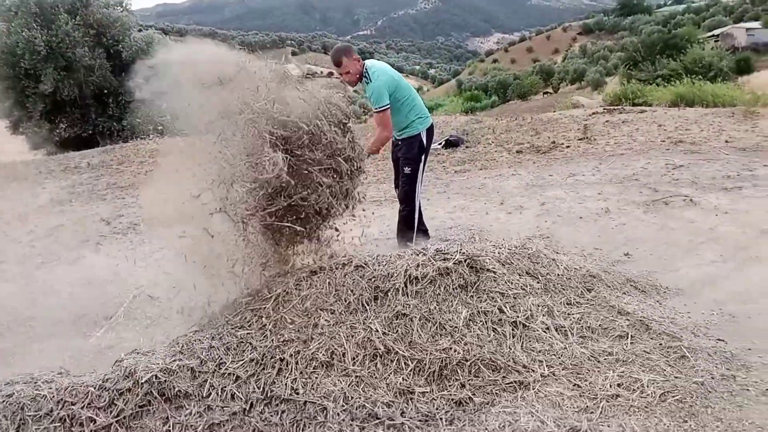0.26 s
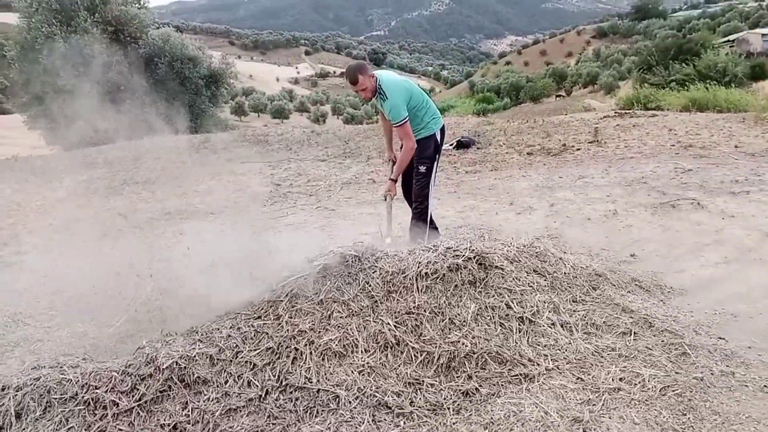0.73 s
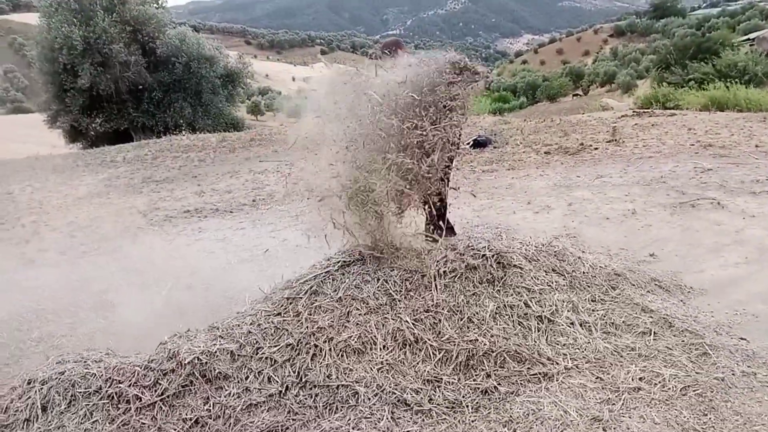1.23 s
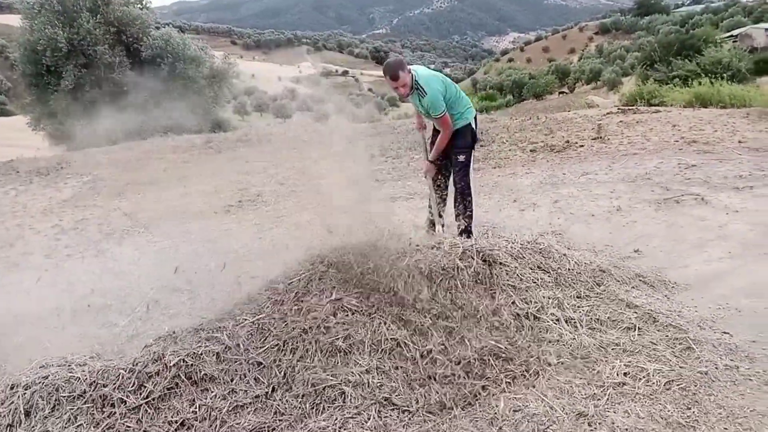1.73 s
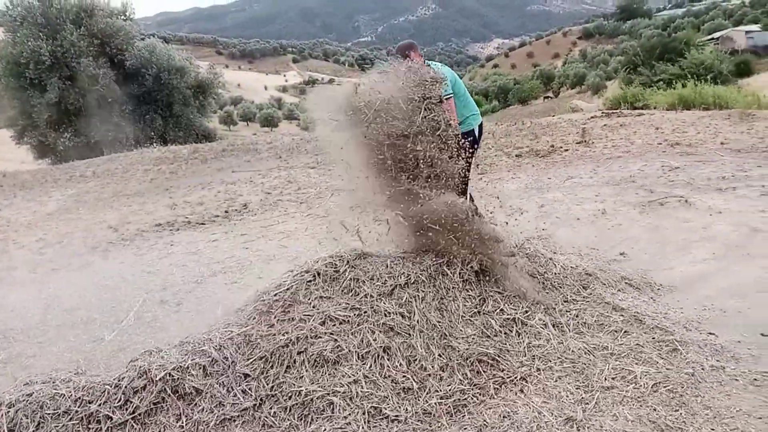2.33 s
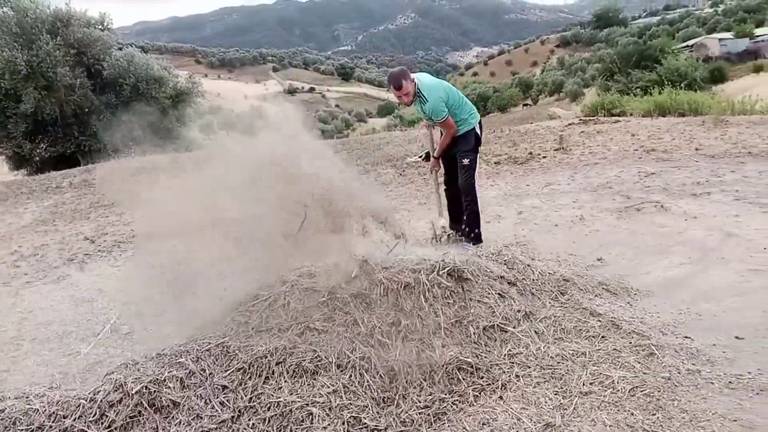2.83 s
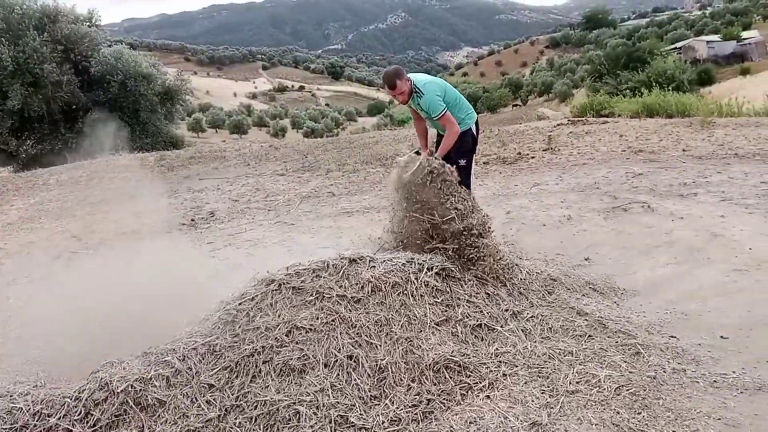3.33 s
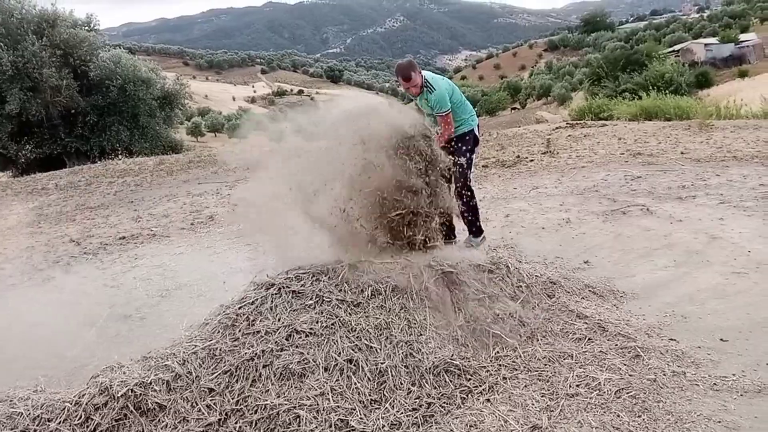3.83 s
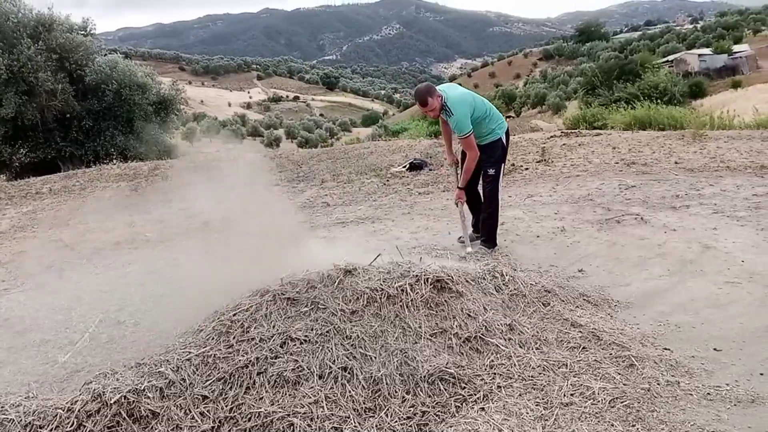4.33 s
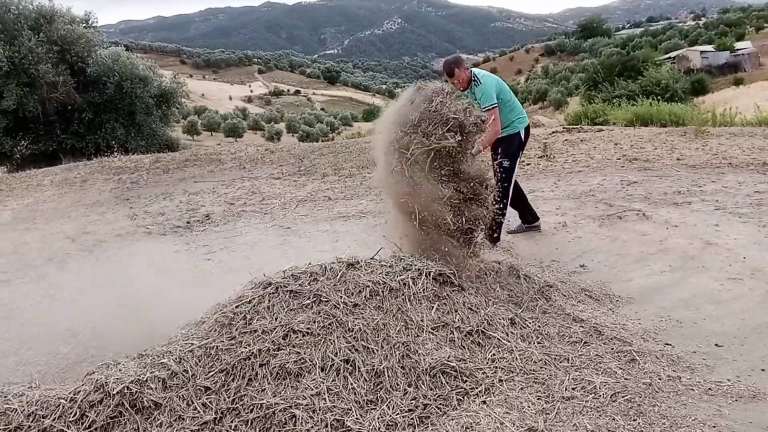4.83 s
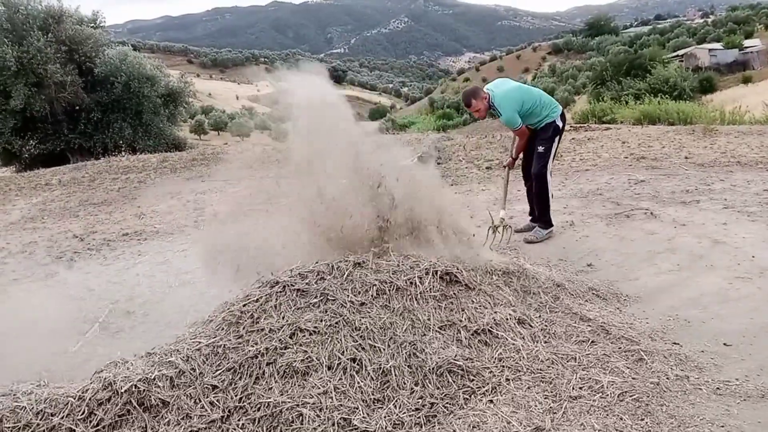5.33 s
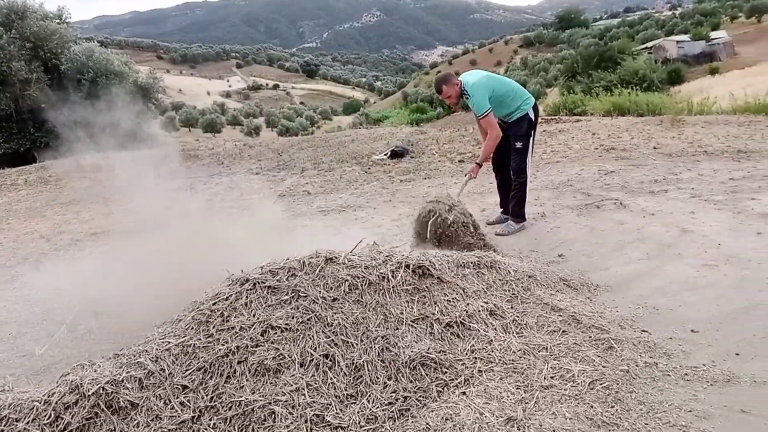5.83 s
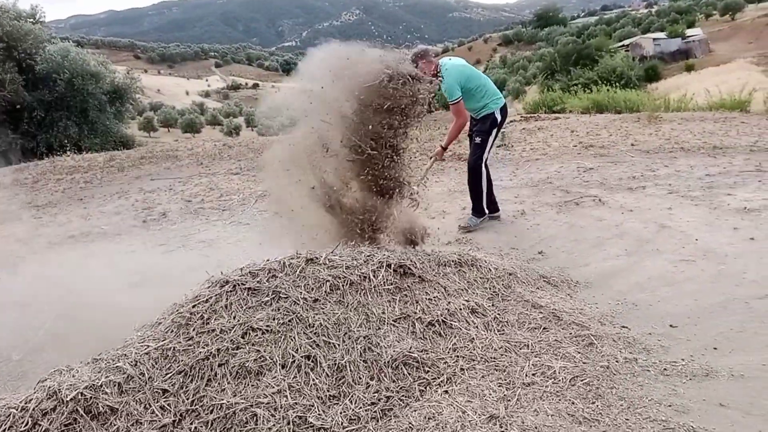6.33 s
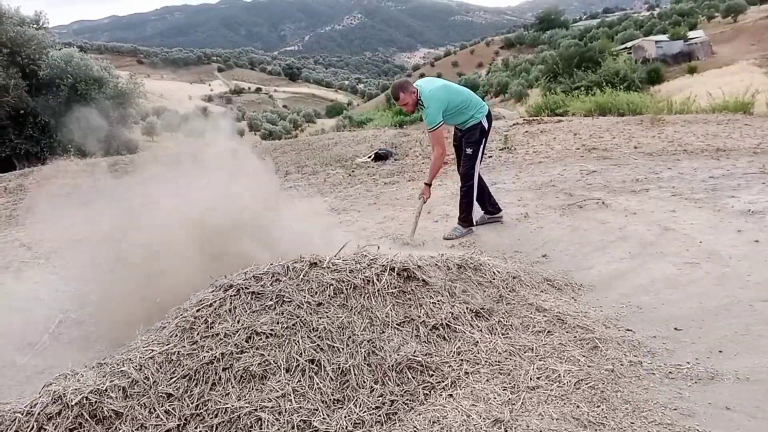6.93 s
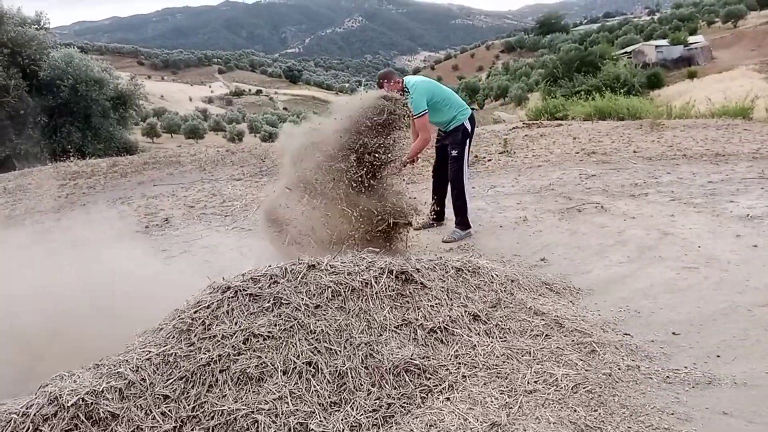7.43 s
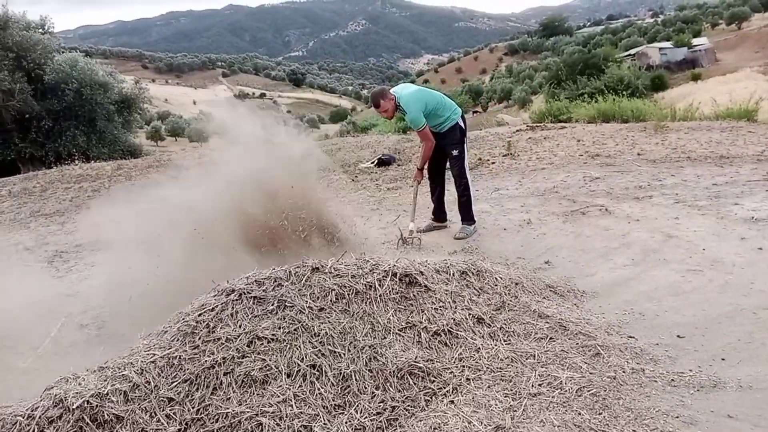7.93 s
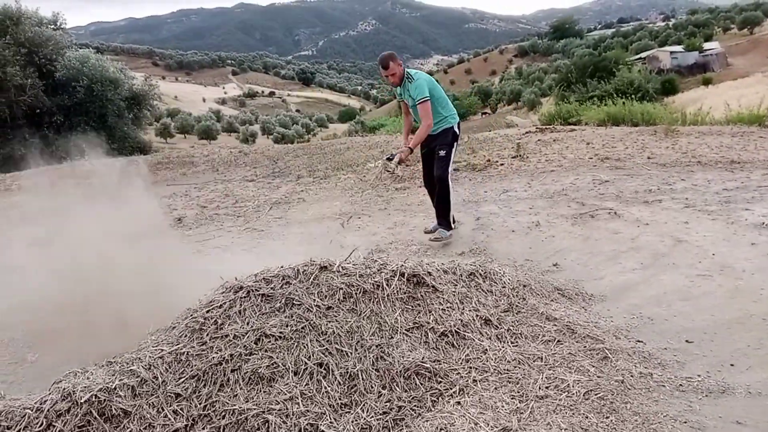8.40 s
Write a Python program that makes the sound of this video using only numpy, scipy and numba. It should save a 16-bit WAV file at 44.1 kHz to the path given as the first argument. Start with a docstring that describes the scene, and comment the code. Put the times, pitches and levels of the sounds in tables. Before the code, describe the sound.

Dry straw rustles in repeated surges as a pitchfork scrapes and clinks on stones, with wind rumbling on the microphone.

```python
"""Dry straw rustles in surges as a fork is thrust in and the straw is tossed, on an open hillside.
Each surge is thousands of tiny clicks of chaff and stalk, with the odd sharp snap. During and between
the rustles, the steel tines scrape through straw and over the ground and ring on stones. Gusts rumble
on the microphone port; further off, sparrows chirp, a bird whistles and faint hoots sound over a
quiet hiss."""
import sys
import numpy as np
from scipy import signal
from scipy.fft import rfft, irfft
from scipy.io import wavfile
from scipy.ndimage import uniform_filter1d
from numba import njit

SR = 44100
rng = np.random.default_rng(int(sys.argv[2]) if len(sys.argv) > 2 else 0)


def pcm_store(signal):
    """Save signal as 16-bit PCM."""
    levels = np.round(np.clip(np.atleast_2d(signal), -1, 1) * 32767)
    wavfile.write(sys.argv[1], SR, levels.astype(np.int16).T)


N = 381906
T = np.arange(N) / SR

# tone of fine chaff and of coarse stalks: (frequency [Hz], relative level [dB])
CHAFF_EQ = [(3500, -26), (4600, -19.5), (5900, -17), (7300, -9), (9400, 4.5), (11500, -6), (13500, -14.5),
            (15500, -1.5)]
STALK_EQ = [(450, -27), (900, -24.5), (1300, -22), (2200, -7.5), (3000, -6.5), (4100, 3.5), (5000, -2.5),
            (6200, -5), (7500, 2.5), (9000, -30.5)]
# surges of rustle: (time [s], hold [s], level [dB], rise [dB/s], fall [dB/s], stalks against chaff [dB])
RUSTLES = [(0.21, 0.0078, -60.5, 36, 74, -11), (0.53, 0.13, -52.5, 71, 150, -7),
           (1.622, 0.24, -41, 141, 111, -5), (2.7, .18, -47, 44.5, 87, -6),
           (3.78, 0.063, -47, 72.5, 96, -7), (4.11, 0.0067, -52.5, 55, 127, -7.5),
           (5.39, 0.15, -56.5, 24, 97, -9.5), (6.49, 0.011, -63, 41, 46, -10.5),
           (6.812, 0.077, -43, 115, 182, -8.5), (7.73, 0.017, -60, 62, 200, -7),
           (7.91, 0.027, -63, 71, 38, -2), (8.06, 0.026, -57, 204, 80, -7)]
# chaff adrift on the wind between surges: (time [s], level [dB])
CHAFF_DRIFT = [(0.0, -61), (0.4, -60.5), (0.75, -62.5), (0.96, -61.5), (1.1, -67.5), (1.45, -60.5),
               (2.1, -69), (2.4, -64), (3.2, -65.5), (4.38, -58.5), (4.46, -69.5), (4.6, -65.5), (5.6, -61),
               (5.8, -77.5), (6.0, -66), (6.3, -76), (7.05, -64), (7.24, -68), (7.6, -73.5), (8.2, -82),
               (8.45, -86), (8.66, -78)]


def straw(drift_stalks_db=-11.5, clump_db=1.5, clumps_per_s=14):
    """Straw rustles as it is forked and tossed: fine chaff hisses high, hollow stalks ring lower."""
    drift = curve(CHAFF_DRIFT) ** 2
    surges = [(swell(*shape), undb(stalks_db) ** 2) for *shape, stalks_db in RUSTLES]
    chaff_power = drift + sum(power for power, _ in surges)
    stalk_power = drift * undb(drift_stalks_db) ** 2 + sum(power * share for power, share in surges)
    chaff = rattle(CHAFF_EQ, tumble_s=.008, cycles=1.18, spread_db=2.5, hit_db=2.0, pieces=30000)
    chaff *= np.sqrt(chaff_power) * undb(0.92 * walk(30))
    stalks = rattle(STALK_EQ, tumble_s=.02, cycles=3.8, spread_db=1.5, hit_db=1.0, pieces=20000)
    stalks *= np.sqrt(stalk_power) * undb(0.8 * walk(30))
    return undb(clump_db * walk(clumps_per_s)) * (chaff + stalks)


def rattle(eq, tumble_s, cycles, spread_db, hit_db, pieces, knocks=5):
    """Each piece has its own pitch and size and knocks several times as the straw shifts."""
    low, high = eq[0][0], eq[-1][0]
    register, bulk, arrival = rng.random((pieces, 3)).T
    offset, force, polarity = rng.random((pieces, knocks, 3)).T
    pitch = low * (high / low) ** register
    # high rings are short and sparse per hertz: pitch squared makes up for it
    size = pitch ** 2 * undb(-spread_db * np.log(bulk + .002))
    at = (arrival * N + tumble_s * SR * (offset - .5)).clip(0).astype(np.int64)
    hits = size * undb(-hit_db * np.log(force + .002)) * np.sign(polarity - .5)
    return colour(grains(at.ravel(), np.tile(pitch, knocks), cycles, hits.ravel()), eq)


@njit
def grains(at, hz, cycles, size):
    """Every knock is one tiny ring that swells and dies, starting at its own sample."""
    out = np.zeros(N)
    for k in range(len(at)):
        pole = np.exp((2j * np.pi - 1 / cycles) * hz[k] / SR)
        decay, ring = size[k] + 0j, 0j
        for i in range(at[k], min(at[k] + int(6 * cycles / hz[k] * SR), N)):
            decay *= pole
            ring = ring * pole + decay
            out[i] += ring.imag
    return out


# single stalks breaking: (time [s], level [dB], pitch [Hz])
STALK_SNAPS = [(0.137, -42, 9420), (0.3127, -43, 9650), (0.415, -40, 9500), (0.4908, -35, 11000),
               (0.608, -29, 10400), (0.7275, -24.5, 8730), (1.233, -46, 10700), (1.3997, -46, 8950),
               (1.4941, -33.5, 7100), (1.505, -32, 6800), (1.5266, -37, 9000), (1.5569, -49, 8500),
               (1.5985, -19.5, 7500), (1.638, -21, 9000), (1.6538, -22, 9400), (1.731, -23.5, 8500),
               (1.7614, -20.5, 9000), (1.947, -29, 7080), (1.9893, -37, 8890), (2.3825, -42.5, 6900),
               (2.5585, -27.5, 8100), (2.6224, -46, 9510), (2.7616, -40, 10700), (2.805, -31, 9260),
               (2.8557, -29, 9400), (2.9269, -23, 8900), (3.3334, -46, 9150), (3.7521, -35.5, 7140),
               (3.901, -32, 9360), (3.946, -35, 7070), (4.055, -42, 10000), (4.1046, -36, 9700),
               (4.2316, -51, 9280), (5.1032, -40, 8900), (5.1821, -40.5, 8600), (5.2536, -43, 8950),
               (5.535, -37, 9880), (5.5916, -44, 9800), (5.654, -39, 9300), (6.4746, -45, 8240),
               (6.6787, -43, 9850), (6.7207, -36, 9550), (6.796, -44, 9300), (6.8516, -24, 9410),
               (6.8993, -29, 7250), (6.95, -32.5, 9600), (7.5546, -44.5, 9600), (8.0574, -31.5, 9300)]


def snaps():
    """A stalk snaps with a bright tick and a softer ring about an octave below."""
    out = np.zeros(N)
    for when, db, hz in STALK_SNAPS:
        add_ring(out, when, db - 0.5, hz, cycles=2.2)
        add_ring(out, when, db - 13, 0.509 * hz, cycles=1.16)
    return out


# resonances of the steel tines: (frequency [Hz], nominal width [Hz], relative level [dB])
TINE_MODES = [(1276.6, 23, -13.5), (1425, 51, -13), (1746, 42, -4.5), (2202, 76, -1.5), (2552, 51, -5),
              (2834, 27, -14.5), (3112, 77, 3), (3677, 83, 6.5), (4170, 30, -3), (4684, 80, -4.5),
              (5280, 49, -13), (6030, 49, -12.5), (6920, 48, -10.5), (7310, 49, -13), (7400, 66, -12.5),
              (7670, 51, -11), (9640, 350, -1)]
# drags through straw and over the ground: (time [s], hold [s], level [dB])
FORK_DRAGS = [(0.145, 0.075, -64), (0.3, 0.15, -71.5), (0.51, 0.184, -55), (0.712, 0.047, -45),
              (0.79, 0.024, -53.5), (0.825, 0.028, -47.5), (0.877, 0.046, -46), (1.66, .17, -55.5),
              (1.839, .16, -51), (2.56, .22, -65), (2.8, .17, -54.5), (3.027, 0.089, -53.5),
              (3.15, 0.068, -69), (3.66, .26, -60), (4.03, 0.15, -62), (4.3, 0.035, -57.5),
              (4.345, 0.079, -54), (5.38, 0.091, -66.5), (5.49, 0.094, -61.5), (5.601, 0.11, -53.5),
              (5.74, 0.04, -64.5), (5.83, 0.13, -71.5), (6.677, 0.012, -54.5), (6.73, 0.14, -59),
              (6.86, 0.091, -49), (7.01, 0.026, -59.5), (8.06, 0.059, -57.5), (8.14, 0.042, -48)]


def fork_scrape(bite_db_s=902, lift_db_s=496, grit_per_s=4000):
    """Grit slips under the tines and rings them, each mode caught and let go on its own."""
    gain = np.sqrt(sum(swell(*row, bite_db_s, lift_db_s) for row in FORK_DRAGS))
    slips = rng.random(N) < grit_per_s / SR
    grit = slips * undb(1.1 * rng.exponential(size=N)) * rng.standard_normal(N)
    grit *= undb(2.85 * walk(45))
    drag = np.zeros(N)
    for hz, width, db in TINE_MODES:
        mode = bandpass(bandpass(grit, hz, 2.05 * width), hz, 2.35 * width)
        drag += undb(db + 5.1 * walk(30)) * unit(mode)
    return gain * unit(drag)


# tines catching on stones: (time [s], strength [dB], favoured pitch [Hz])
STONE_HITS = [(0.5166, -38, 3960), (0.706, -41, 3930), (0.7218, -36, 3040), (0.7544, -42, 3750),
              (0.7947, -52, 3640), (0.8273, -42, 3660), (0.8789, -30, 3640), (0.9098, -35.5, 3750),
              (1.8994, -39, 3760), (1.9494, -36, 3750), (2.0368, -48, 3000), (2.7798, -38, 4220),
              (2.958, -47, 3570), (3.025, -35, 3750), (3.0544, -62, 3770), (3.119, -40, 3680),
              (3.1894, -47, 1760), (3.2257, -54, 3220), (4.2954, -39, 4200), (4.342, -38, 3070),
              (4.3644, -45, 3750), (4.3994, -58, 3120), (5.103, -36.5, 4750), (5.55, -41.5, 2540),
              (5.6528, -34, 3670), (5.6944, -44, 3650), (5.744, -42, 3560), (5.7823, -51, 2870),
              (6.8983, -33, 2800), (6.9213, -39, 3700), (6.977, -37.5, 3690), (7.02, -48, 4160),
              (7.5465, -47, 1800), (8.0795, -36, 3660), (8.1599, -36, 4000), (8.1778, -37, 1750)]


def stone_catches(rolloff_db_octave=52, grind_s=.005):
    """A stone gives the tines a brief grinding jolt that rings the modes near one pitch most."""
    out = np.zeros(N)
    hz, width, mode_db = np.transpose(TINE_MODES)
    t = np.arange(int(.06 * SR)) / SR
    modes = np.exp(-np.pi * .6 * np.outer(width, t)) * np.sin(2 * np.pi * np.outer(hz, t))
    for when, db, favoured_hz in STONE_HITS:
        off_pitch_db = rolloff_db_octave * np.abs(np.log2(hz / favoured_hz))
        shares = undb(db - 2.5 + 0.4 * mode_db - off_pitch_db + 2.0 * rng.standard_normal(len(hz)))
        grind = np.exp(-t[:600] / grind_s) * rng.standard_normal(600)
        clink = signal.fftconvolve(shares @ modes, grind / np.linalg.norm(grind))
        at = int(when * SR)
        out[at:at + len(t)] += clink[:len(t)] / 3
    return out


# tone of the rumble: (frequency [Hz], relative level [dB])
WIND_EQ = [(25, -34.5), (45, -4.5), (70, 5.5), (110, 6), (160, -3.5), (230, -12.5), (330, -42)]
# breeze under the gusts: (time [s], level [dB])
BREEZE_BED = [(0.0, -74.5), (0.55, -80.5), (0.9, -74), (1.6, -69), (1.95, -70.5), (2.4, -73.5), (2.75, -81),
              (3.8, -85), (4.0, -64), (4.2, -61), (4.3, -82), (4.6, -78), (5.4, -85), (5.9, -80),
              (6.4, -83.5), (7.4, -80), (7.9, -69), (8.66, -70)]
# gusts on the port: (time [s], hold [s], level [dB])
WIND_GUSTS = [(0.0, 0.0033, -47), (0.29, 0.0068, -73), (0.38, 0.011, -64), (0.86, 0.031, -57.5),
              (1.03, 0.0063, -63.5), (1.35, 0.071, -59.5), (1.76, 0.047, -53), (2.35, .01, -60),
              (2.511, 0.031, -55.5), (3.09, 0.091, -50), (3.399, 0.062, -51), (3.79, .005, -75),
              (3.926, 0.0068, -47.5), (4.05, 0.14, -51), (4.385, 0.012, -52), (5.69, 0.048, -52),
              (5.859, 0.01, -60), (6.12, 0.0076, -53), (6.2, 0.0059, -54), (6.269, 0.0038, -52),
              (6.85, 0.0092, -69), (7.48, 0.082, -62.5), (7.72, .005, -60.5), (7.78, 0.055, -57.5),
              (7.91, 0.037, -54), (8.02, 0.042, -48.5), (8.21, 0.061, -51.5), (8.32, 0.043, -46.5),
              (8.42, 0.058, -54)]
# single thumps of air: (time [s], level [dB], pitch [Hz])
AIR_THUMPS = [(3.908, -40.5, 122), (3.928, -40.5, 178), (4.086, -51, 617), (4.123, -32.5, 261),
              (4.126, -31, 114), (6.192, -40.5, 129)]


def wind(rise_db_s=412, fall_db_s=406):
    """Eddies break over the microphone port as low, lumpy rumble, now and then as one thump."""
    gusts = sum(swell(*row, rise_db_s, fall_db_s) for row in WIND_GUSTS)
    eddies = rng.standard_normal(N) * undb(6.2 * walk(30))
    out = np.sqrt(curve(BREEZE_BED) ** 2 + gusts) * colour(eddies, WIND_EQ)
    for when, db, hz in AIR_THUMPS:
        add_ring(out, when - .5 / hz, db, hz, cycles=.5 + hz / 500)
    return out


# sparrow chirps and a lower whistle, one list per call: (time [s], pitch [Hz], level [dB])
SPARROW_CALLS = [
    [(4.565, 4400, -66), (4.582, 4050, -61), (4.598, 4500, -62), (4.606, 4000, -62), (4.616, 3150, -72.5),
     (4.634, 4400, -71), (4.642, 3350, -73), (4.66, 3300, -78)],
    [(4.825, 4500, -67), (4.84, 5100, -64), (4.846, 3700, -61), (4.858, 3650, -49.5), (4.868, 4100, -70),
     (4.876, 3100, -67), (4.905, 3150, -79)],
    [(6.29, 4500, -78), (6.302, 4450, -67), (6.354, 3050, -67), (6.376, 4560, -90), (6.426, 3261, -67.5),
     (6.47, 3300, -79)],
    [(7.46, 4405, -86), (7.484, 4000, -65), (7.514, 4040, -78), (7.542, 3130, -70), (7.57, 3200, -79)],
    [(7.592, 4400, -38), (7.608, 4050, -61), (7.624, 4550, -60), (7.636, 3850, -69), (7.654, 3800, -58),
     (7.666, 4500, -60), (7.677, 3250, -60), (7.7, 3500, -71), (7.72, 4400, -74), (7.78, 4420, -64)],
    [(8.38, 4300, -82), (8.386, 4070, -73.5), (8.436, 3356, -81), (8.45, 2945, -93)],
]
WHISTLE_CALLS = [
    [(8.23, 2160, -84), (8.25, 2224, -77), (8.288, 2125, -64.5), (8.33, 1916, -70), (8.398, 1860, -82),
     (8.41, 1810, -91)],
    [(8.54, 1830, -99), (8.592, 1845, -80), (8.626, 1810, -82), (8.652, 1970, -89), (8.66, 1904, -87)],
]


def bird(calls, warble, warble_hz, flutter_db):
    """A gliding near sine, shaken by a fast warble and fluttering on its way through moving air."""
    out = np.zeros(N)
    for rows in calls:
        span, gain, (hz,) = contour(rows)
        shake = warble * (np.sin(2 * np.pi * warble_hz * T[span]) + .5 * walk(300, len(hz)))
        flutter = undb(flutter_db * (walk(101, len(hz)).clip(max=1) - 0.5))
        phase = 2 * np.pi * np.cumsum(hz * (1 + shake)) / SR
        out[span] += gain * flutter * np.sqrt(2) * np.sin(phase)
    return out


# faint low hoots: (start [s], end [s], pitch [Hz], level [dB])
HOOT_NOTES = [(3.099, 3.426, 620, -67), (3.146, 3.219, 1014, -74), (3.337, 3.47, 1000, -78.5),
              (3.705, 3.772, 947, -75.5), (5.598, 5.732, 628, -74), (7.444, 7.519, 784, -71.5),
              (7.585, 7.632, 737, -77), (7.741, 7.891, 971, -81)]


def hoots(breath_width_hz=54.0):
    """Soft, breathy tones that waver in pitch and level."""
    out = np.zeros(N)
    for start, end, hz, db in HOOT_NOTES:
        span, gain, _ = contour([(start, db), (end, db)])
        size = len(gain)
        breath = bandpass(rng.standard_normal(size), hz, breath_width_hz)
        breath = unit(bandpass(breath, hz, breath_width_hz))
        phase = 2 * np.pi * np.cumsum(hz * (1 + 0.0146 * walk(40.1, size))) / SR
        out[span] += gain * undb(2.9 * walk(37.7, size)) * (np.sin(phase) + 0.65 * breath)
    return out


def hillside(x, t60_s, wet_db):
    """Trees and slopes scatter a distant call into a short smear."""
    t = np.arange(int(.3 * SR)) / SR
    tail = rng.standard_normal(len(t)) * undb(-60 * t / t60_s)
    return x + undb(wet_db) * signal.oaconvolve(x, tail / np.linalg.norm(tail))[:N]


# tone of the background hiss: (frequency [Hz], relative level [dB])
AIR_EQ = [(120, -5.5), (200, -6), (300, -6.5), (500, -8.5), (1000, -12.5), (2300, -15), (3600, -13),
          (6000, -45), (9600, -23.5), (13400, -31.5), (15800, -22)]


def open_air(level_db=-78.5):
    """The quiet hiss of the hillside, gently wavering."""
    return undb(level_db + 1.1 * walk(6.3)) * colour(rng.standard_normal(N), AIR_EQ)


def undb(db):
    return 10 ** (np.asarray(db) / 20)


def unit(x):
    return x / np.sqrt(np.mean(x ** 2))


def curve(rows):
    """Gain for every sample from (time [s], level [dB]) rows."""
    return undb(np.interp(T, *np.transpose(rows)))


def swell(when, hold_s, db, rise_db_s, fall_db_s):
    """Power envelope that rises until when, holds, then falls, at steady dB per second."""
    return undb(db - rise_db_s * (when - T).clip(0) - fall_db_s * (T - when - hold_s).clip(0)) ** 2


def contour(rows):
    """A call's sample span, its soft-ended gain from the last column, and curves for any others."""
    times, *columns = np.transpose(rows)
    span = slice(int(times[0] * SR), min(int(times[-1] * SR), N))
    *others, db = (np.interp(T[span], times, column) for column in columns)
    return span, undb(db) * signal.windows.tukey(len(db), .15), others


def walk(rate, size=N):
    """Random levels held 1 / rate s and smoothed twice; spread near 1."""
    hold = max(int(SR / rate), 1)
    steps = np.repeat(rng.standard_normal(size // hold + 1), hold)
    return 1.5 * uniform_filter1d(uniform_filter1d(steps, hold), hold)[:size]


def add_ring(out, when, db, hz, cycles):
    """Mixes in a short tone that swells to db over the given cycles, then dies."""
    t = np.arange(int(5 * cycles / hz * SR)) / SR
    age = t * hz / cycles
    wave = undb(db) * age * np.exp(1 - age) * np.sin(2 * np.pi * hz * t)
    at = int(when * SR)
    out[at:at + len(t)] += wave[:len(out) - at]


@njit
def bandpass(x, hz, width):
    """State-variable band-pass, gain 1 at the centre."""
    y, band, low = np.empty(len(x)), 0., 0.
    g, damping = np.tan(np.pi * hz / SR), width / hz
    for i in range(len(x)):
        v = (band + g * (x[i] - low)) / (1 + g * (g + damping))
        band, low, y[i] = 2 * v - band, low + 2 * g * v, damping * v
    return y


def colour(x, eq):
    """Shapes x with a minimum-phase EQ of (frequency [Hz], level [dB]) rows, at rms 1."""
    hz, db = np.transpose(eq)
    bins = np.fft.rfftfreq(4096, 1 / SR)
    gain_db = np.interp(np.log(bins + 1), np.log(hz), db, left=-60)
    cepstrum = irfft(gain_db * np.log(10) / 20)
    cepstrum[1:2048] *= 2  # folded forward, so nothing rings ahead of a click
    cepstrum[2049:] = 0
    impulse = irfft(np.exp(rfft(cepstrum)))
    return unit(signal.oaconvolve(x, impulse)[:N])


def scene():
    """Straw, fork and wind up front, distant calls and hiss behind, all at one microphone."""
    air = open_air()
    sparrows = bird(SPARROW_CALLS, warble=0.026, warble_hz=90, flutter_db=3.5)
    whistle = bird(WHISTLE_CALLS, warble=0.0059, warble_hz=29.7, flutter_db=-0.5)
    near = straw() + snaps() + fork_scrape() + stone_catches() + wind()
    far = hillside(sparrows + whistle + hoots(), t60_s=0.2, wet_db=-5.5)
    mono = near + far + air
    return np.array([mono, mono])


def record(dry):
    """The phone cuts the top steeply."""
    cutoff_hz = 15830
    return signal.sosfilt(signal.ellip(12, .3, 80, cutoff_hz, fs=SR, output="sos"), dry)


dry = scene()
out = record(dry)
pcm_store(out)
```